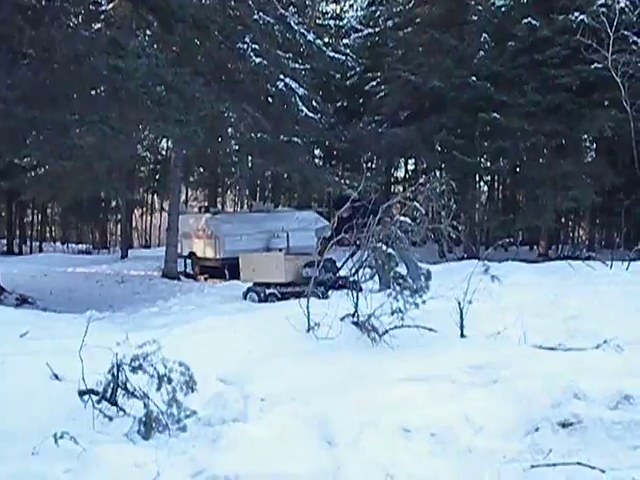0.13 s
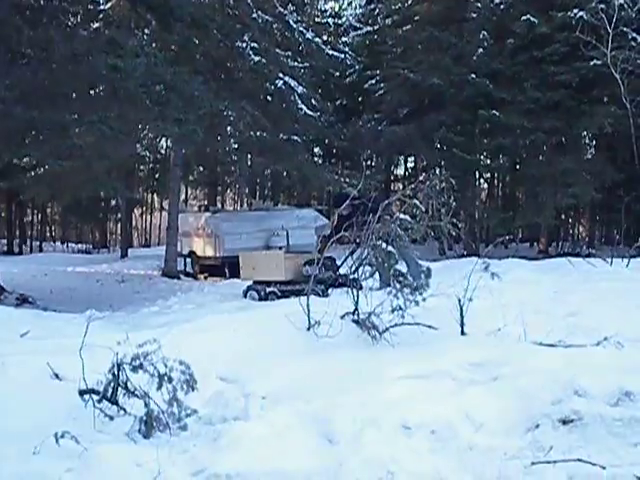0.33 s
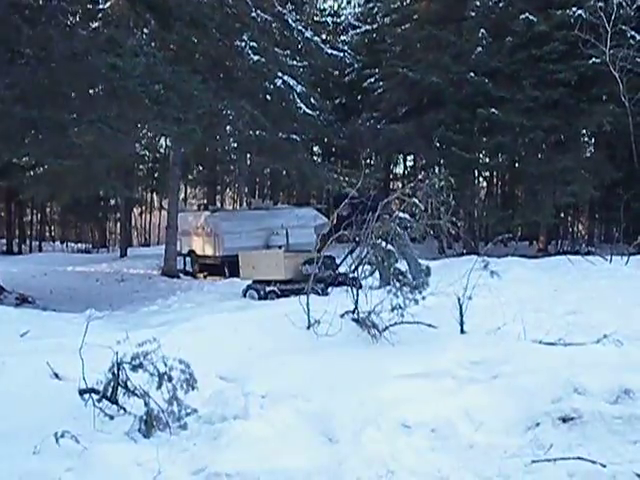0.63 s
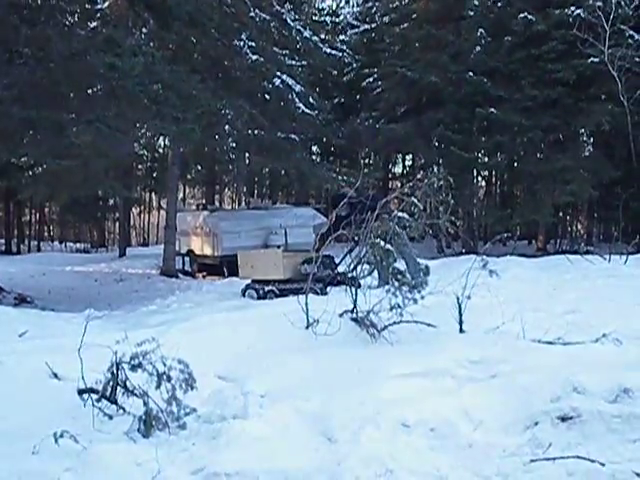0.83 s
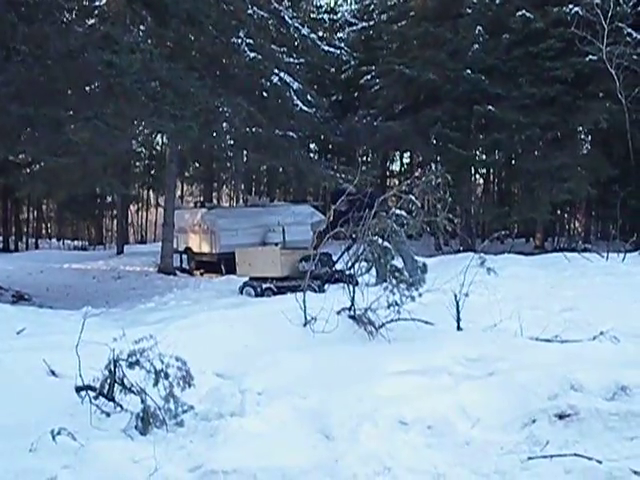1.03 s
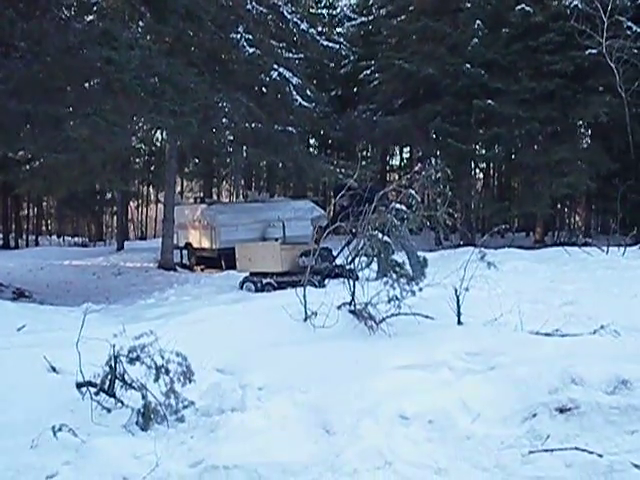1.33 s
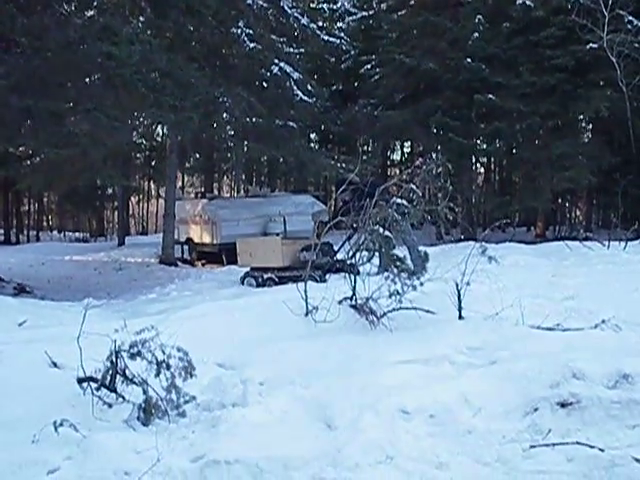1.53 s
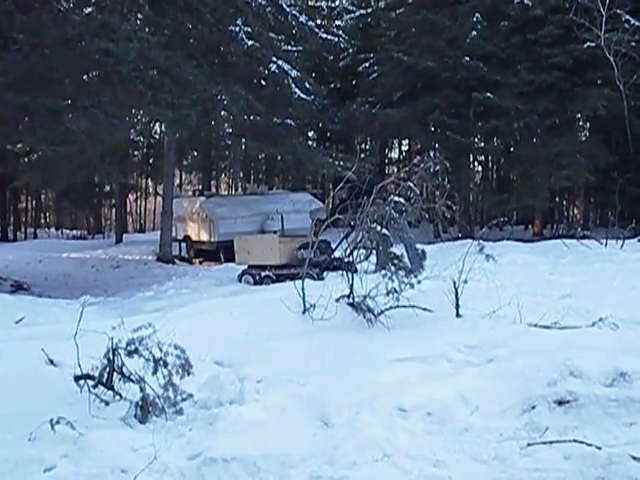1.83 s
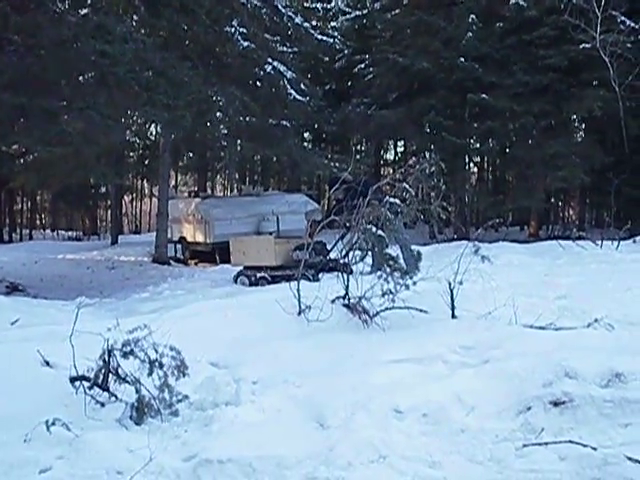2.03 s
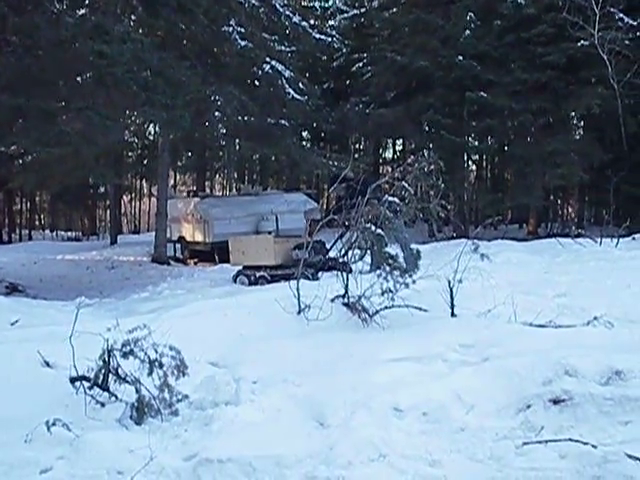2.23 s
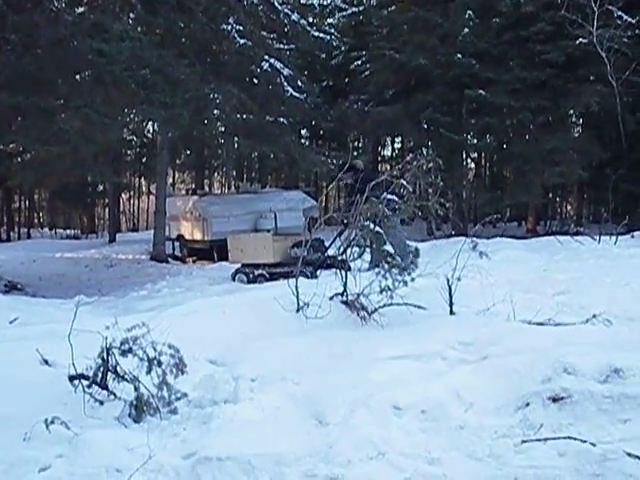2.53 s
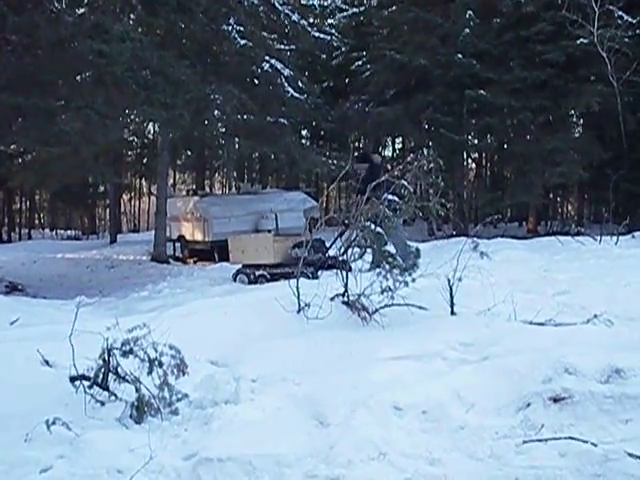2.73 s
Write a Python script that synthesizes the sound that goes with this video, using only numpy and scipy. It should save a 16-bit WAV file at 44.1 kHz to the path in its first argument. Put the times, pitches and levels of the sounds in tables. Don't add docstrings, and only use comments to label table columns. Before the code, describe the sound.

A small single-cylinder engine on a tracked carrier is already running, fading in quickly by 0.1 s. It chugs at about 26 beats per second to the end near 2.9 s, slightly uneven, with low exhaust throb, humming panels, valve ticks and dense metallic rattle. Between 0.6 and 1.8 s its tone shifts gradually as it turns. Irregular hard knocks clip the narrow, midrange-heavy microphone; faint air rumble lies beneath.

```python
import sys
import numpy as np
from scipy import signal
from scipy.io import wavfile

SR = 44100
rng = np.random.default_rng(int(sys.argv[2]) if len(sys.argv) > 2 else 0)


def nominal_scale(level):
    x = np.asarray(level, float) / 20
    return 10 ** x


def inscribe(sig):
    pcm = np.round(np.clip(np.atleast_2d(sig).T, -1, 1) * 32767)
    wavfile.write(sys.argv[1], SR, pcm.astype(np.int16))


N = 127890
TURN_START_S, TURN_END_S = 0.62, 1.81

CYCLE_HZ, FIRST_CYCLE_S = 26.0886, 0.11784
# (time [s], lateness [ms])
GOVERNOR_DELAY = [(0.12, 0.19), (0.27, 0.32), (0.58, -1), (0.69, 0.56), (0.85, -0.77), (0.96, 0.37),
                  (1.04, -0.63), (1.19, 1.2), (1.38, -0.25), (1.61, -0.46), (1.73, 0.37), (2.0, -0.61),
                  (2.19, 0.67), (2.3, 0.16), (2.42, 0.53), (2.65, -0.45), (2.72, 0.54)]


def cycles():
    late_ms, = in_time(GOVERNOR_DELAY)
    return (np.arange(N) / SR - FIRST_CYCLE_S - late_ms / 1000) * CYCLE_HZ


# (time [s], level [dB])
EFFORT = [(0.14, -14.5), (0.15, -14), (0.61, -15), (0.64, -18), (0.67, -15), (0.75, -16.5), (0.92, -14),
          (1.71, -15.5), (1.78, -14.5), (1.81, -17), (1.83, -14), (1.84, -14.5), (2.81, -15), (2.86, -15.5)]


def engine_load():
    load_db, = in_time(EFFORT)
    return nominal_scale(load_db - load_db.mean())


EXHAUST_AT, EXHAUST_SPREAD = 0.3, 0.06
EXHAUST_DB, EXHAUST_WOBBLE_DB = 3.0, 2.3
# (multiple of the cycle, level before the turn [dB], level after [dB])
EXHAUST_PARTIALS = [(2, -64, -64), (3, -64, -63), (4, -50, -49), (5, -53, -51), (6, -57, -57),
                    (7, -51, -51), (8, -43, -45), (9, -46, -46), (10, -33, -44), (11, -45, -44),
                    (12, -39, -42), (13, -44, -43), (14, -45, -44)]


def exhaust(turn):
    lags = EXHAUST_SPREAD * rng.standard_normal(len(EXHAUST_PARTIALS))
    out = np.zeros(N)
    for lag, (multiple, before_db, after_db) in zip(lags, EXHAUST_PARTIALS):
        level_db = swung(before_db, after_db) + EXHAUST_DB + EXHAUST_WOBBLE_DB * drift(6.7)
        out += nominal_scale(level_db) * np.cos(2 * np.pi * (multiple * (turn - EXHAUST_AT) - lag))
    return out


HIT_SPREAD_DB, HIT_DRIFT_DB = 3, 1.04


def knocks(turn, table, jitter_ms):
    out, number = np.zeros(N), np.arange(-4, 74)
    for share, hz, width_hz, before_db, after_db in table:
        time_chance, level_chance = rng.standard_normal((len(number), 2)).T
        at = np.interp(number + share, turn, np.arange(N)) + time_chance * jitter_ms * SR / 1000
        at = at - SR / np.pi / width_hz
        at = np.clip(at, 0, N - 1).astype(int)
        level_db = swung(before_db, after_db) + HIT_DRIFT_DB * drift(2.5)
        within = number + share < turn[-1]
        clicks = np.zeros(N)
        clicks[at] = nominal_scale(level_db[at] + HIT_SPREAD_DB * level_chance) * SR / width_hz * within
        out += resonate_twice(clicks, hz, width_hz)
    return out


# (share of cycle, frequency [Hz], width [Hz], level before the turn [dB], level after [dB])
CASING_CONTACTS = [(.32, 440, 254, -6, -6), (.87, 410, 232, -13, -15), (0.1776, 700, 248, -12.5, -9.5),
                   (0.63, 590, 216, -7.5, -9.5), (0.97, 686, 250, -9.5, -3.5), (0.1407, 877, 277, -1.5, -8),
                   (.31, 1000, 500, -8.5, -13.5), (.575, 926, 473, 3, 1.5), (0.96, 1050, 380, -1, -11),
                   (0.034, 1300, 330, -0.5, -9.5), (0.68, 1400, 370, -3.5, -4), (0.56, 620, 230, -14, -15),
                   (.07, 900, 300, -5, -8)]


def casing_knocks(turn):
    return nominal_scale(-20.5) * knocks(turn, CASING_CONTACTS, jitter_ms=0.17)


# (share of cycle, frequency [Hz], width [Hz], level before the turn [dB], level after [dB])
VALVE_CONTACTS = [(0.17, 1600, 620, -12, -4), (.55, 1900, 500, -6, -6), (0.75, 1800, 670, -6, -0.5),
                  (.33, 2560, 500, -7, -6), (0.48, 3100, 570, -3.5, -5), (0.68, 2100, 450, -14, -14),
                  (0.94, 2600, 620, -8.5, -5), (0.24, 3160, 650, -11, -10), (.83, 3224, 500, -12, -10.5),
                  (.22, 2100, 400, -17.5, -17), (0.74, 2700, 640, -10.5, -6.5)]


def valve_ticks(turn):
    return nominal_scale(-17) * knocks(turn, VALVE_CONTACTS, jitter_ms=0.23)


def ringing_hits(table, rise_ms):
    t = np.arange(600) / SR
    u = t * 1000 / rise_ms
    shape = u * np.exp(1 - u)
    sound, envelope = np.zeros((2, N + len(t)))
    for s, db, hz in table:
        at = slice(int(s * SR), int(s * SR) + len(t))
        sound[at] += nominal_scale(db) * shape * np.cos(2 * np.pi * hz * (t - rise_ms / 1000))
        envelope[at] += shape
    return sound[:N], np.clip(envelope[:N], 0, 1)


# (time [s], peak level [dB], frequency [Hz])
BODY_BLOWS = [(0.1, -9, 842), (0.138, -6.5, 880), (0.177, -7, 877), (0.199, -18, 1260), (0.275, -15, 970),
              (0.314, -11, 985), (0.39, -10.5, 832), (0.445, -12, 842), (0.518, -7.5, 840),
              (0.559, -7, 845), (0.652, -11, 820), (0.671, -3, 1300), (0.691, -10, 1230), (0.71, -2, 1265),
              (0.729, -4, 1220), (0.851, -9, 781), (0.866, -7, 937), (0.904, -12, 880), (0.981, -13, 851),
              (1.001, -10, 837), (1.058, -16, 806), (1.173, -9.5, 864), (1.196, -4.5, 872),
              (1.351, -11, 800), (1.441, -8.5, 1040), (1.505, -10, 830), (1.555, -9, 870), (1.633, -9, 846),
              (1.657, -12, 775), (1.671, -7, 875), (1.824, -11, 1010), (1.847, -11, 781),
              (1.863, -4.5, 1016), (1.886, -13, 781), (1.901, -8, 864), (1.939, -24, 920), (1.978, -8, 850),
              (2.016, -10.5, 1020), (2.039, -15, 786), (2.054, -11, 870), (2.131, -12, 850),
              (2.269, -12, 781), (2.285, -7, 880), (2.323, -12, 855), (2.4, -8, 840), (2.438, -12, 864),
              (2.461, -10, 867), (2.515, -6, 844), (2.591, -18, 875), (2.743, -9, 1040)]


def body_blows():
    sound, envelope = ringing_hits(BODY_BLOWS, rise_ms=0.98)
    return nominal_scale(-3) * sound, envelope


# (time [s], peak level [dB], frequency [Hz])
VALVE_CLACKS = [(0.0768, -14.5, 2350), (0.0903, 2, 2530), (0.1666, -6, 2530), (0.2065, -11, 2560),
                (0.2452, -12, 2200), (0.3216, -9, 2790), (0.3592, -10, 2530), (0.4072, -9, 2530),
                (0.474, -12, 2520), (0.5113, -17, 2560), (0.5992, -7, 2360), (0.6655, -9.5, 2760),
                (0.705, -13, 2520), (0.826, -12, 2430), (0.8563, -8, 2280), (0.8943, -9, 2110),
                (1.1646, -14, 2190), (1.2023, -18, 2470), (1.317, 2.5, 2460), (1.3663, -5.5, 2450),
                (1.4416, -4, 2470), (1.4704, -5.5, 2520), (1.5857, -3.5, 2550), (1.622, -9.5, 2440),
                (1.6678, -11.5, 2566), (1.6994, -12, 2570), (1.8616, -11, 2330), (1.979, -7, 2430),
                (2.0461, -8, 2460), (2.0833, -12, 2430), (2.129, -3, 2760), (2.1601, -7, 2060),
                (2.199, -1.5, 2540), (2.2383, -4, 2570), (2.2715, -17, 2500), (2.392, -4, 2650),
                (2.4382, -4, 2370), (2.5432, -6, 2540), (2.7303, -9, 2355), (2.847, -3, 2526)]


def valve_clacks():
    sound, envelope = ringing_hits(VALVE_CLACKS, rise_ms=0.9)
    return nominal_scale(-1) * sound, envelope


SLAP_WIDTH_MS, SLAP_DUCK = 0.1, 0.9
SLAP_RING, SLAP_RING_HZ = 0.3, 950
# (time [s], signed height [full scale])
HARD_KNOCKS = [(.1389, .62), (.3931, -.6), (.4757, -.7), (.6769, .62), (.6921, -.68), (.9053, .67),
               (1.0594, .64), (1.587, -.66), (1.596, .62), (1.9705, -.67), (1.9794, .7), (2.2395, -.61),
               (2.2778, -.63), (2.3624, .65), (2.4402, .62), (2.5928, .63), (2.6222, -.64), (1.0875, -.73),
               (1.3185, .775), (1.3953, -.89), (1.6728, .735), (1.9412, .79), (2.0551, .84), (2.6592, -.69),
               (2.8897, -.83)]


def slaps(rest):
    t, out = np.arange(N) / SR, rest
    for s, height in HARD_KNOCKS:
        u = ((t - s) * 1000 / SLAP_WIDTH_MS) ** 2
        pulse = 1.4 * (np.exp(-u / 2) - np.exp(-u / 32) / 4)
        ring = np.exp(-u / 200) * np.cos(2 * np.pi * SLAP_RING_HZ * (t - s))
        duck = 1 - SLAP_DUCK * np.exp(-u / 30)
        out = out * duck + height * ((1 - SLAP_RING) * pulse + SLAP_RING * ring)
    return out


HUM_DB, HUM_WOBBLE_DB, HUM_SLIP = 2.5, 2.5, 0.043
# (multiple of the cycle, level before the turn [dB], level after [dB])
HUM_PARTIALS = [(17, -45, -44), (18, -47, -52), (20, -29, -38), (22, -41, -42), (24, -39, -39),
                (25, -38, -37), (27, -34, -27), (29, -42, -36), (32, -28, -38), (33, -40, -37),
                (34, -34, -38), (38, -37, -36), (40, -39, -37), (46, -36, -41)]


def hum(turn):
    out = np.zeros(N)
    for multiple, before_db, after_db in HUM_PARTIALS:
        level_db = swung(before_db, after_db) + HUM_DB + HUM_WOBBLE_DB * drift(7.2)
        phase = multiple * turn + rng.random() + HUM_SLIP * drift(28)
        out += nominal_scale(level_db) * np.cos(2 * np.pi * phase)
    return out


# (frequency [Hz], width [Hz], level [dB])
PANEL_MODES = [(2427, 81, -37), (2563, 220, -34.5), (2774, 84, -32.5), (1197, 46, -41), (755, 130, -35.5)]


def panel_ringing(clicks):
    out = np.zeros(N)
    for hz, width_hz, db in PANEL_MODES:
        ring = rms_one(resonate_twice(clicks, hz, width_hz))
        out += nominal_scale(db + 1.1 * drift(7.3)) * ring
    return out


RATTLE_DB, RATTLES_PER_S = -21.5, 3000
RATTLE_SIZE_DB, RATTLE_PATCHY_DB = 1.5, 1.67
# (frequency [Hz], level per hertz [dB])
RATTLE_COLOUR = [(120, -31), (220, -14.5), (400, -8.5), (720, -10), (1500, -0.5), (2600, 0), (3400, -9.5),
                 (4500, -27)]


def rattle():
    sizes = nominal_scale(RATTLE_SIZE_DB * np.minimum(rng.exponential(1, (2, N)), 5))
    signs = rng.choice([-1, 1], (2, N))
    clicks = sizes * signs * (rng.random((2, N)) < RATTLES_PER_S / SR)
    edges = 150 * 2 ** np.arange(0, 5.1, 1 / 3)
    hz, db = np.transpose(RATTLE_COLOUR)
    together, out = drift(8.6), np.zeros(N)
    for k, (low, high) in enumerate(zip(edges, edges[1:])):
        sos = signal.butter(2, [low, high], "band", fs=SR, output="sos")
        band = signal.sosfilt(sos, clicks[k // 3 % 2])
        colour_db = np.interp(np.log(low * high) / 2, np.log(hz), db)
        patchy_db = RATTLE_PATCHY_DB * (0.38 * together + drift(5.7))
        out += band * nominal_scale(colour_db + patchy_db)
    return nominal_scale(RATTLE_DB) * rms_one(out) + panel_ringing(clicks[0])


SNAPS_PER_S, SNAP_DB, SNAP_SPREAD_DB, SNAP_HZ = 53, -13, 0.5, 1540


def snaps():
    struck = (rng.random(N) < SNAPS_PER_S / SR) * rng.choice([-1, 1], N)
    clicks = struck * nominal_scale(SNAP_DB + SNAP_SPREAD_DB * rng.standard_normal(N))
    u = (np.arange(-40, 41) / SR * np.pi * SNAP_HZ) ** 2
    return np.convolve(clicks, (1 - 2 * u) * np.exp(-u), "same")


RUMBLE_DB, RUMBLE_HZ = -61, 55


def air_rumble():
    sos = signal.butter(2, RUMBLE_HZ, fs=SR, output="sos")
    return rms_one(signal.sosfilt(sos, rng.standard_normal(N)))


def rms_one(x):
    return x / np.sqrt(np.mean(x ** 2) + 1e-20)


def in_time(rows):
    s, *columns = np.transpose(rows)
    return [np.interp(np.arange(N) / SR, s, c) for c in columns]


def swung(before, after):
    return np.interp(np.arange(N) / SR, (TURN_START_S, TURN_END_S), (before, after))


def drift(rate_hz):
    r = np.exp(-80 * np.pi * rate_hz / SR)
    slow = signal.lfilter([1], [1, -2 * r, r * r], rng.standard_normal(N // 40 + 2002))[2000:]
    return np.interp(np.arange(N) / 40, np.arange(len(slow)), rms_one(slow))


def resonate(x, hz, width_hz):
    r = np.exp(-np.pi * width_hz / SR)
    zeros = np.array([1, 0, -1]) * (1 - r * r) / 2
    poles = [1, -2 * r * np.cos(2 * np.pi * hz / SR), r * r]
    return signal.lfilter(zeros, poles, x + 1e-18)


def resonate_twice(x, hz, width_hz):
    return resonate(resonate(x, hz, width_hz), hz, width_hz)


HEADROOM, BLOW_DUCK, CLATTER_LOW_HZ = 0.62, 0.35, 170


def scene():
    turn = cycles()
    clatter = casing_knocks(turn) + valve_ticks(turn) + rattle() + snaps()
    body, body_shape = body_blows()
    valve, valve_shape = valve_clacks()
    clatter = clatter * (1 - BLOW_DUCK * np.maximum(body_shape, valve_shape))
    engine = engine_load() * (hum(turn) + clatter) + body + valve
    engine = slaps(HEADROOM * np.tanh(engine / HEADROOM))
    low_cut = signal.butter(2, CLATTER_LOW_HZ, "high", fs=SR, output="sos")
    engine = signal.sosfiltfilt(low_cut, engine)
    air = air_rumble()
    engine = engine + exhaust(turn)
    air_level = nominal_scale(RUMBLE_DB + 2.7 * drift(3.3))
    return (engine + air_level * air)[None]


def band_limit(x):
    return signal.sosfilt(signal.butter(12, 15850, fs=SR, output="sos"), x)


START_S, SWITCH_S = 0.0362, 0.00036
START_DB, FADE_IN_S = -12.5, 0.08
MIC_LOW_HZ, MIC_SLOPE_HZ, MIC_TOP_HZ = 90, 3553, 4655
MIC_DIP_HZ, MIC_DIP_WIDTH_HZ, MIC_DIP = 3996, 580, 0.62
OFFSET, OVERLOAD = -0.0024, 0.703


def record(dry):
    t = np.arange(N) / SR - START_S
    steep = signal.cheby2(10, 30, MIC_TOP_HZ, fs=SR, output="sos")
    gentle = signal.butter(2, MIC_SLOPE_HZ, fs=SR, output="sos")
    low_cut = signal.butter(2, MIC_LOW_HZ, "high", fs=SR, output="sos")
    x = signal.sosfilt(low_cut, signal.sosfiltfilt(np.vstack([steep, gentle]), dry))
    x = x - MIC_DIP * resonate(x, MIC_DIP_HZ, MIC_DIP_WIDTH_HZ)
    fade_in = nominal_scale(START_DB * np.clip(1 - t / FADE_IN_S, 0, 1))
    x = (x * fade_in + OFFSET) * np.clip(t / SWITCH_S, 0, 1)
    mix = np.clip(x, -OVERLOAD, OVERLOAD)
    return band_limit(mix)


dry = scene()
out = record(dry)
inscribe(out)
```